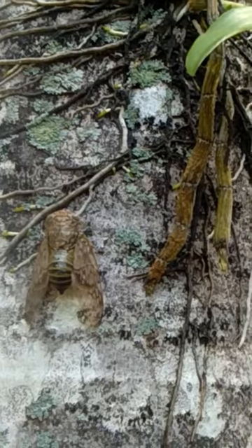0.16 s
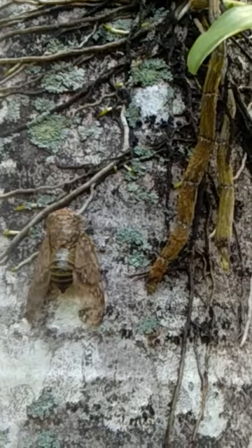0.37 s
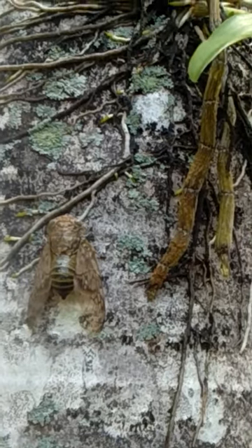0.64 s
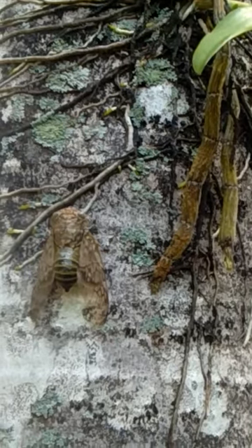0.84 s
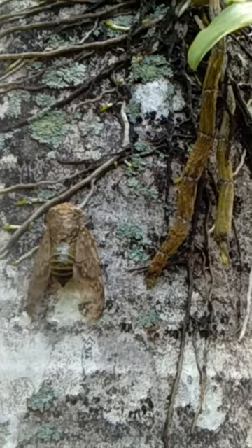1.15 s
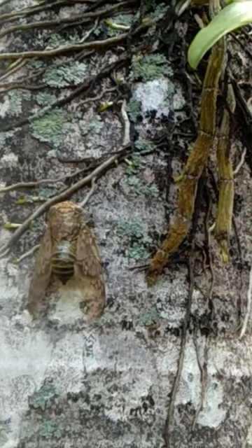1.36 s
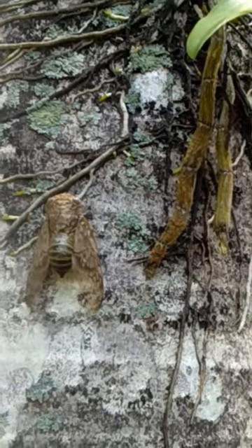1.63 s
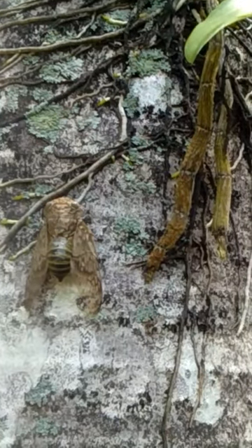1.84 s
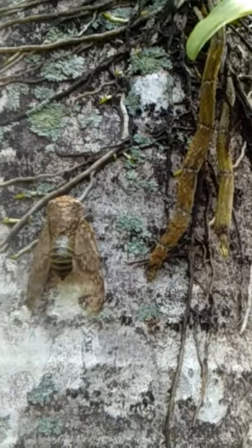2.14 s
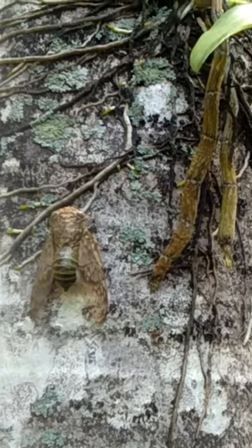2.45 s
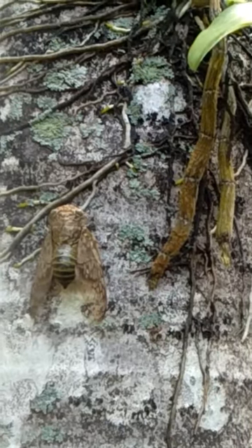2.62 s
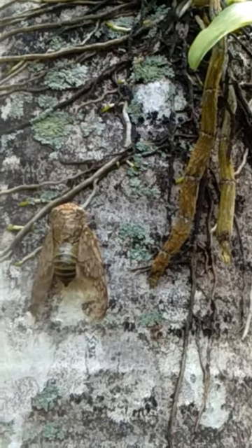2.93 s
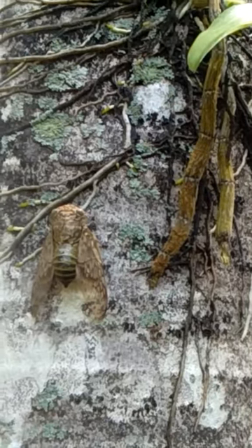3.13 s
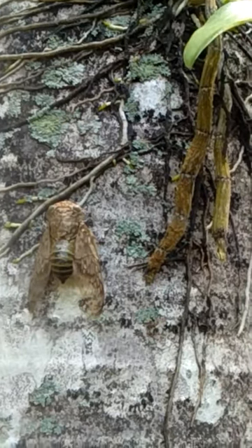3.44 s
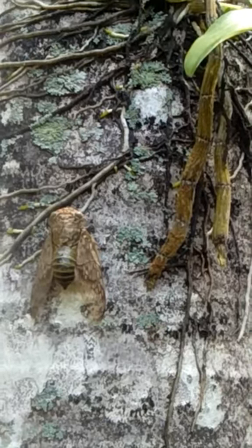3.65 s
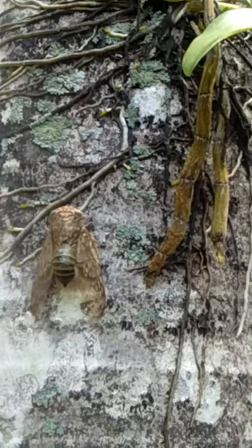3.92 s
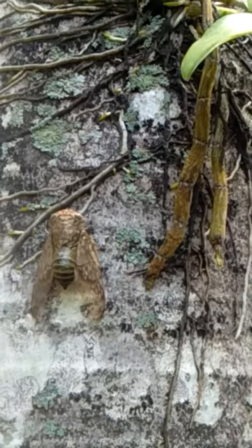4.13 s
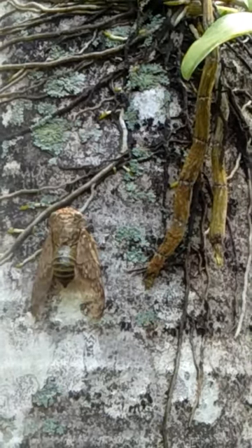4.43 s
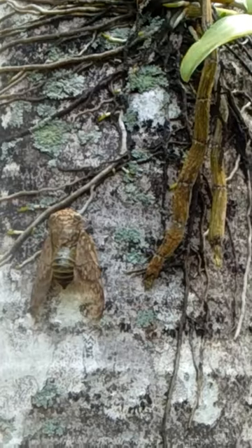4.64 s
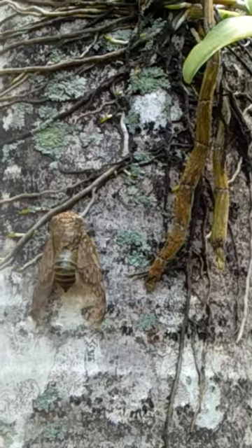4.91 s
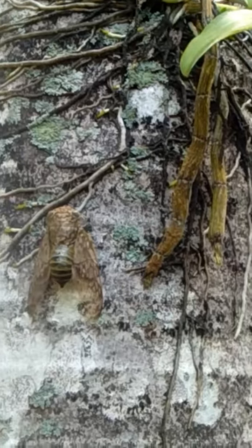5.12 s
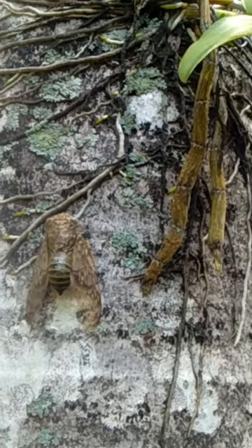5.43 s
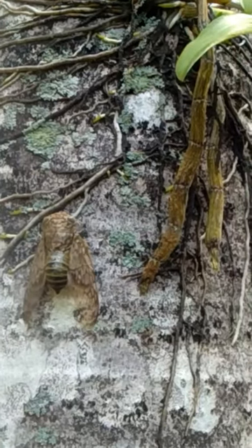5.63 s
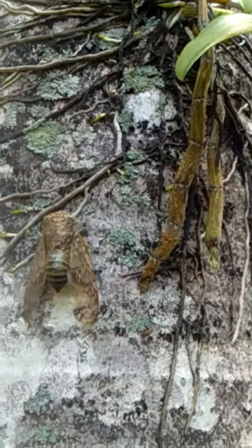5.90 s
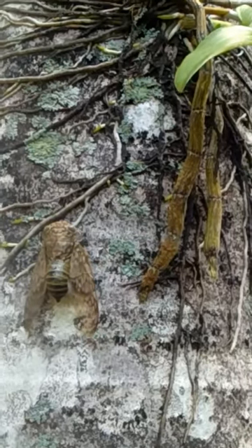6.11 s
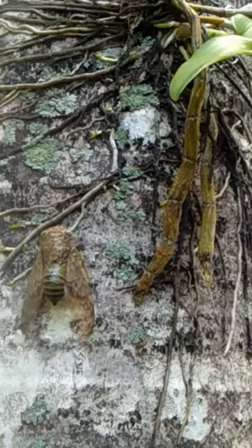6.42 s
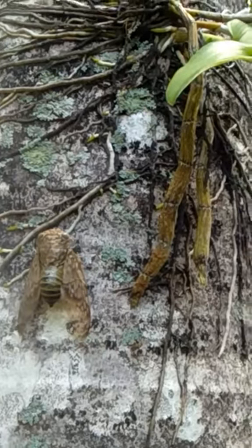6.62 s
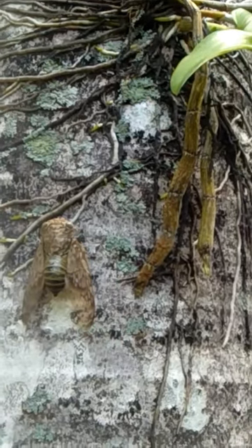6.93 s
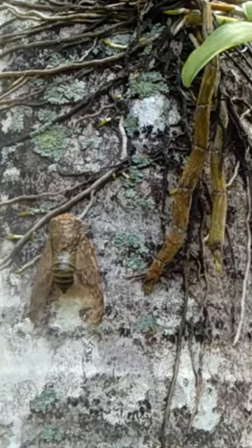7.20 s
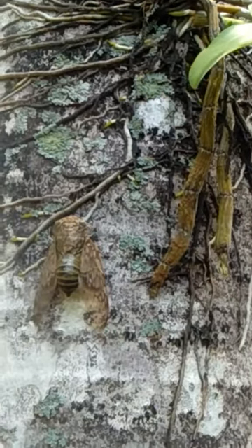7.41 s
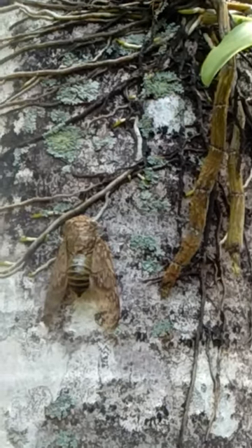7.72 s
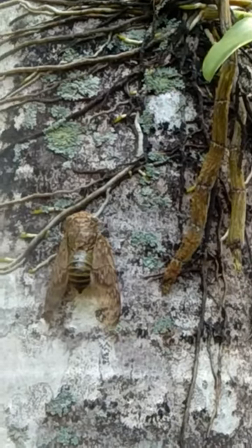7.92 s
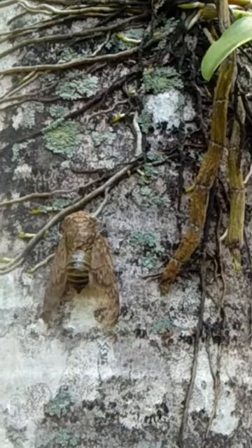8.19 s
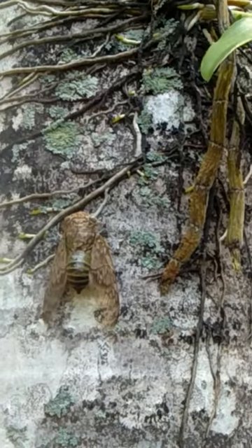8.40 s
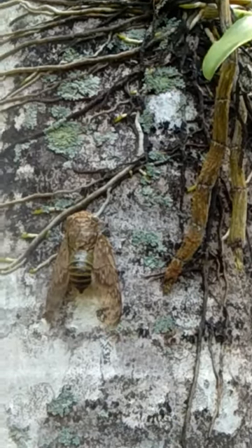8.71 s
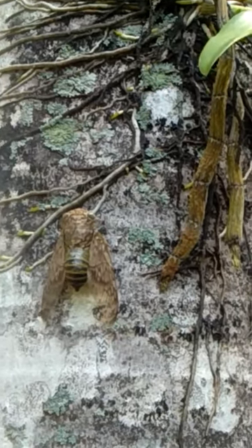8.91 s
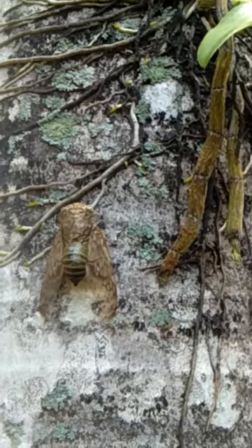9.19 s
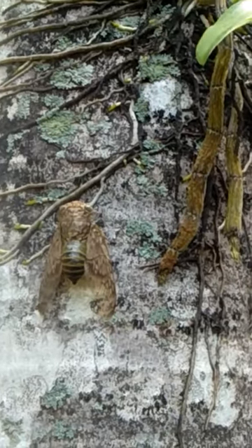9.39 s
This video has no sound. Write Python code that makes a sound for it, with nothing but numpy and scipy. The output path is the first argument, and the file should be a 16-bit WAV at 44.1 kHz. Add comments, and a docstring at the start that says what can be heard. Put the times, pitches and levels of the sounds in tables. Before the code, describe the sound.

Loud, continuous insect whine, centred and close: extremely rapid clicks fuse into a bright, sizzling tone with a coarse low drone from microphone overload. Tiny dropouts make it flicker, especially early on. The timbre broadens before one second, stays that way, then narrows again near seven and continues to the end. Rock and roots give only a very short echo, over faint open air.

```python
"""A cicada sings on a rock close to a small microphone: each muscle stroke buckles three ribs of its tymbal, and every
buckle rings the tymbal and the air sac. Weak strokes already mark the opening, over a faint rumble and hiss, and
noise swells with the strokes. After half a second the abdomen rises and retunes the song, with a short swell in level;
it stays raised until about 6.5 s, then sinks in steps until it is lowered at the end. A short echo off stone and roots
follows the song. Throughout, the loud song overloads the microphone lopsidedly: a low buzz at the stroke rate."""
import sys
import numpy as np
from scipy import signal
from scipy.fft import rfft, irfft, next_fast_len
from scipy.io import wavfile
from scipy.ndimage import uniform_filter1d, map_coordinates

SR = 44100
rng = np.random.default_rng(int(sys.argv[2]) if len(sys.argv) > 2 else 0)


def file_out(sig):
    """Save sig as 16-bit WAV at sys.argv[1]."""
    # one column per channel
    cols = np.atleast_2d(sig).T
    # limit, then scale
    lim = np.clip(cols, -1, 1)
    pcm = np.round(lim * 32767).astype(np.int16)
    wavfile.write(sys.argv[1], SR, pcm)


N = 421155

# Pace of the tymbal muscle: time_s, rate_strokes_per_s
STROKE_PACE = [(0, 381), (.6, 382.3), (1.1, 383.7), (1.75, 383.55), (2.04, 386.11), (2.48, 382.46),
               (2.8, 382.77), (4.05, 386.23), (4.4, 383.54), (4.74, 384.85), (5.37, 382.79), (6.02, 384),
               (7.8, 383.43), (8.6, 381.7), (9, 380.5), (9.55, 380.55)]
# Rib buckles of one stroke, a list per posture: delay_ms, signed_size_ratio
RIB_BUCKLES = [
    [(0, 1), (.642, -.344), (.92, -.648)],
    [(0, 1), (.795, -.521), (1.019, .594)],
    [(0, 1), (.929, -.836), (1.044, .517)],
]
# Modes of tymbal and air sac, a list per posture: pitch_hz, width_hz, relative_level_db
BODY_MODES = [
    [(6774, 392, -5.8), (8761, 621, 1.4), (9509, 398, -15.3)],
    [(6634, 514, -11.5), (8373, 661, 3.7), (9143, 200, -12.8)],
    [(6894, 960, -5.9), (8295, 1528, 17.4), (8538, 1823, 15.7)],
]
# Faint lower resonance of the thorax, one per posture: pitch_hz, width_hz, relative_level_db
THORAX_MODES = [(4800, 1300, -25), (4400, 810, -24), (4160, 490, -33)]
# Height of the abdomen: time_s, posture_index (0 lowered, 1 half way, 2 raised)
ABDOMEN_POSTURE = [(0, 0.67), (.56, 0.17), (.63, 0.82), (.73, 0.92), (.9, 2.08), (6.45, 2.5), (6.58, 1.95),
                   (6.8, 1.6), (6.95, 0.97), (7.04, 1.23), (7.1, .55), (7.4, 0.25), (9.55, 0.022)]
# Loudness curve of the song: time_s, relative_level_db
SONG_LEVEL = [(0, -14.5), (.56, -15), (.74, -12.5), (.85, -15), (2.5, -15.5), (4.2, -15.5), (6.5, -15.5),
              (7.02, -14), (7.1, -15), (9.55, -15)]
# Falters of the muscle: start_s (first weak stroke), length_strokes, depth_db
WEAK_STROKES = [(.019, 2, -5), (.032, 1, -6), (.04, 2, -4), (.05, 2, -6), (.561, 3, -9), (.58, 3, -2),
                (.702, 1, -8), (.958, 2, -6), (.974, 1, -5), (1.12, 1, -7), (1.125, 1, -10),
                (1.169, 1, -10), (1.211, 1, -9), (1.216, 2, -8), (1.247, 1, -5), (1.253, 1, -11),
                (1.537, 2, -10), (1.641, 1, -10), (1.735, 3, -5), (1.987, 1, -12), (2.029, 2, -7),
                (2.039, 1, -4), (2.463, 1, -12), (2.505, 1, -8), (2.516, 1, -8), (2.581, 1, -4),
                (2.589, 1, -7), (2.664, 1, -7), (2.709, 1, -12), (2.866, 1, -12), (2.944, 2, -6),
                (2.957, 2, -7), (3.449, 1, -9), (3.527, 1, -12), (3.532, 1, -12), (4.204, 1, -8),
                (4.272, 1, -7), (4.277, 1, -10), (4.881, 1, -9), (5.047, 1, -9), (5.141, 1, -12),
                (5.147, 1, -11), (5.734, 4, -4), (6.911, 1, -4), (7.052, 2, -6), (7.065, 2, -6),
                (7.347, 1, -6), (7.368, 2, -5), (7.634, 3, -5), (7.649, 4, -2), (7.944, 2, -5),
                (7.955, 2, -4), (8.955, 1, -4), (8.96, 1, -9), (8.971, 2, -4), (9.223, 2, -8),
                (9.333, 1, -9), (9.341, 1, -8)]
# Colour of the noise under the song: pitch_hz, relative_level_db_per_hz
NOISE_COLOUR = [(2500, -44), (3600, -28.5), (4300, -14.5), (5500, -16), (6900, -1), (8500, -38),
                (10200, -13.5), (11500, -23.5), (13200, -15.5), (13800, -27), (15500, -39)]
# Colour of the open air: pitch_hz, relative_level_db_per_hz
AIR_COLOUR = [(20, -9), (50, -4.5), (105, 9), (250, -24), (1000, -6), (3000, -4.5), (6000, -18),
              (15500, -36)]
# Fader curve of the rumble: time_s, gain_db
RUMBLE_GAIN = [(0, -46), (2, -47.5), (6.3, -46.5), (7.2, -45.5), (9.55, -45)]
# Microphone response to its overload product: pitch_hz, gain_db
OVERLOAD_RESPONSE = [(20, -30), (120, -2.5), (400, 0), (1200, -1), (2500, -2.5), (4000, -5.5), (13000, -20),
                     (16000, -21)]

# Shares of a falter's depth: in the stroke before, in the stroke after, and in each later one over the one before it
BEFORE_SHARE, AFTER_SHARE, RECOVERY = 0.1, 0.19, 0.64
TOP_HZ = 15450  # upper band limit of the microphone


def amp(db):
    """Gain of a level in dB."""
    return 10 ** (np.asarray(db) / 20)


def unit(x):
    """x at rms 1."""
    return x / np.sqrt(np.mean(x ** 2) + 1e-20)


def coloured(x, points):
    """x through a zero-phase filter of (Hz, dB) points on a log axis."""
    size = next_fast_len(N + 8192)
    hz, db = np.transpose(points)
    bins_hz = np.fft.rfftfreq(size, 1 / SR)
    gain = amp(np.interp(np.log(bins_hz + 1), np.log(hz), db))
    return irfft(rfft(x, size) * gain, size)[..., :N]


def wobble(rate, s):
    """A smooth random curve, rate knots a second, read at times s."""
    knots = rng.standard_normal(int(N / SR * 200))
    return map_coordinates(knots, [s * rate + 2])


def stroke_times():
    """Onsets of the strokes: the pace wanders, rocks about 24 times a second and trembles a little."""
    s = np.arange(N) / SR
    strokes_done = np.cumsum(np.interp(s, *np.transpose(STROKE_PACE))) / SR
    even = np.interp(np.arange(strokes_done[-1]), strokes_done, s)
    rocking = np.sin(2 * np.pi * 24 * even + 1.37 * wobble(4, even))
    tremor_phase = 2 * np.pi * 110.8 * even
    shift_us = 45 * wobble(18, even) + 25 * wobble(70, even)
    shift_us += 60 * rocking - 14 * np.sin(tremor_phase)
    shift_us += 14 * rng.standard_normal(len(even))
    return even + shift_us / 1e6, np.cos(tremor_phase)


def ring(t, modes, ribs, chance):
    """One stroke a row: every rib starts all modes as decaying sines; later ribs vary a little in time and size."""
    out = np.zeros(t.shape)
    late_s = 8e-6 * chance[:, [0]]
    later_size = amp(0.59 * chance[:, [1]])
    tension = 1 + 0.0044 * chance[:, [2]]
    for j, (delay_ms, size) in enumerate(ribs):
        since_buckle = np.clip(t - delay_ms / 1000 - (j > 0) * late_s, 0, None)
        onset = (1 - np.exp(-since_buckle / .00025)) ** 2
        swell = size * (later_size if j else 1) * onset
        for k, (hz, width_hz, db) in enumerate(modes):
            level = (-1) ** k * amp(db)  # neighbours swing in opposite directions
            decay = np.exp(-np.pi * width_hz * since_buckle)
            out += level * swell * decay * np.sin(2 * np.pi * hz * tension * since_buckle)
    return out


def falters(when):
    """Loss in dB of each stroke: a sudden drop, then a few strokes to regain full strength."""
    drop_db = np.zeros(len(when))
    for s, count, db in WEAK_STROKES:
        first = np.argmin(abs(when + .0005 - s))  # listed times fall half a millisecond into the stroke
        drop_db[first:first + count] = db
    after_db = signal.lfilter([0, AFTER_SHARE], [1, -RECOVERY], drop_db)
    before_db = BEFORE_SHARE * np.roll(drop_db, -1)
    return np.where(drop_db < 0, drop_db, after_db + before_db)


def stroke_noise(song):
    """Coloured noise that swells and fades with the strokes."""
    fast_power = uniform_filter1d(song ** 2, size=13)
    slow_power = uniform_filter1d(song ** 2, size=115)
    swell = np.sqrt(abs(fast_power + .45 * slow_power))
    noise = coloured(swell * rng.standard_normal(N), NOISE_COLOUR)
    return amp(-14.5) * noise * np.sqrt(SR / 2 / 3000)


def cicada():
    """Tymbal strokes cross-faded between postures of the abdomen, which retunes them, with noise under the song."""
    when, tremor = stroke_times()
    chance = rng.standard_normal((len(when), 4))  # per stroke: rib delay, rib size, tension, level
    at = np.clip(when * SR, 0, None).astype(int)[:, None] + np.arange(200)
    t = at / SR - when[:, None]
    posture = np.clip(np.interp(when, *np.transpose(ABDOMEN_POSTURE)), 0, 2)
    strokes = np.zeros(t.shape)
    for k, (modes, thorax, ribs) in enumerate(zip(BODY_MODES, THORAX_MODES, RIB_BUCKLES)):
        share = np.clip(1 - abs(posture - k), 0, 1)
        rows = share > 0
        rung = unit(ring(t[rows], [*modes, thorax], ribs, chance[rows]))
        strokes[rows] += share[rows, None] * rung
    energy = uniform_filter1d(np.sum(strokes ** 2, axis=1), size=15)
    level_db = np.interp(when, *np.transpose(SONG_LEVEL)) - 0.28
    level_db += 0.12 * chance[:, 3] + 0.31 * wobble(14, when) + 0.21 * tremor
    level_db += falters(when)
    gain = amp(level_db) * np.sqrt(SR / 384 / energy)  # evens out stroke energy at about 384 strokes a second
    song = np.bincount(at.ravel(), (strokes * gain[:, None]).ravel(), N + 400)[:N]
    return song + stroke_noise(song)


def air():
    """A faint outdoor rumble that sways, over a steady hiss, both split from one coloured noise."""
    s = np.arange(N) / SR
    both = unit(coloured(rng.standard_normal(N), AIR_COLOUR))
    rumble = coloured(both, [(200, 0), (300, -60)])
    hiss = both - rumble
    rumble_db = np.interp(s, *np.transpose(RUMBLE_GAIN)) + 1.9 * wobble(4.8, s)
    return amp(rumble_db) * rumble + amp(-47.5) * hiss


def rock(x):
    """Stone and roots send back a short scattered echo: noise that falls 60 dB in 27 ms."""
    t = np.arange(SR // 10) / SR
    tail = rng.standard_normal(len(t)) * amp(-60 * t / 0.027) * (t > .001)
    return signal.fftconvolve(x, tail / np.linalg.norm(tail))[:N]


def scene():
    """Song, echo and air meet at one microphone that feeds both channels."""
    song = cicada()
    return np.tile(song + amp(-17) * rock(song) + air(), (2, 1))


def record(dry):
    """The capsule gives way more on pulls than on pushes: a squared term that eases off at the peaks; then the
    band limit."""
    bright = coloured(dry, [(6000, -5.0), (10000, 2.0)])
    lopsided = bright ** 2 / np.sqrt(1 + (bright / 0.66) ** 2)
    late = np.roll(coloured(lopsided, OVERLOAD_RESPONSE), 3, axis=-1)  # 3 samples late
    size = next_fast_len(N + 8192)
    in_band = np.fft.rfftfreq(size, 1 / SR) < TOP_HZ
    return irfft(rfft(dry - amp(5) * late, size) * in_band, size)[..., :N]


dry = scene()
out = record(dry)
file_out(out)
```